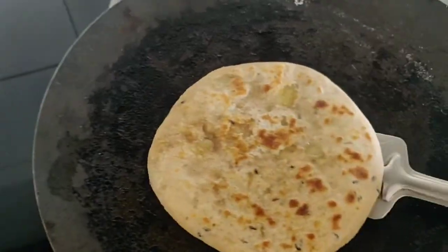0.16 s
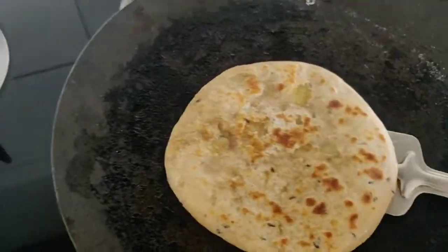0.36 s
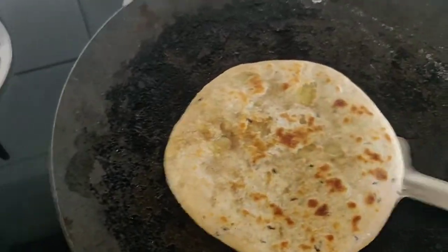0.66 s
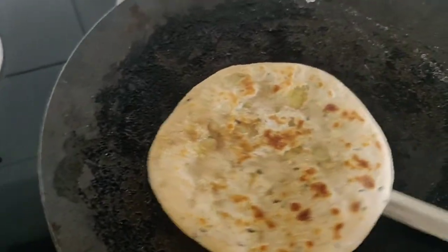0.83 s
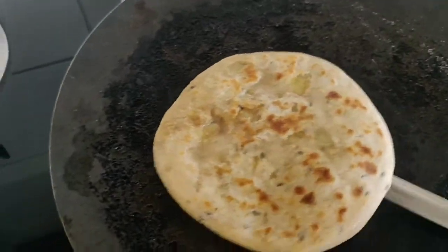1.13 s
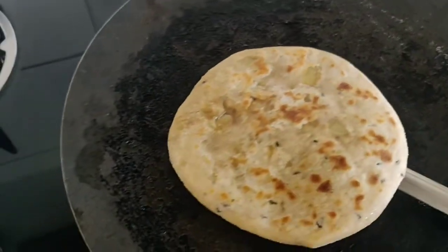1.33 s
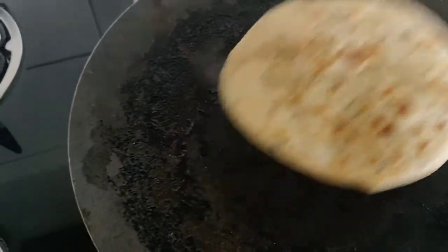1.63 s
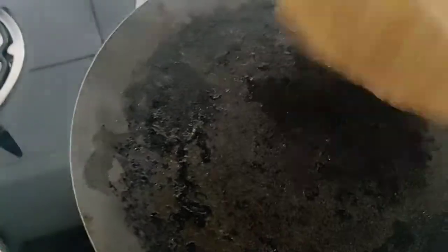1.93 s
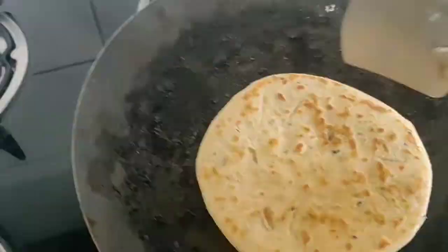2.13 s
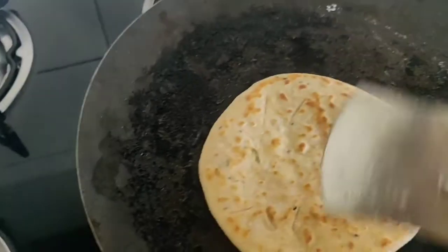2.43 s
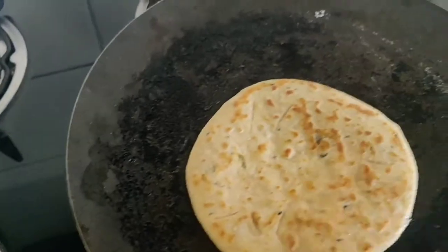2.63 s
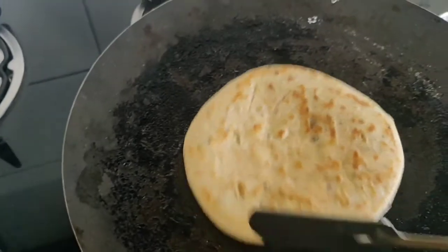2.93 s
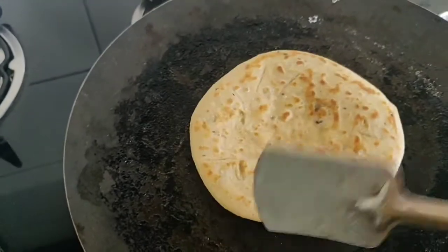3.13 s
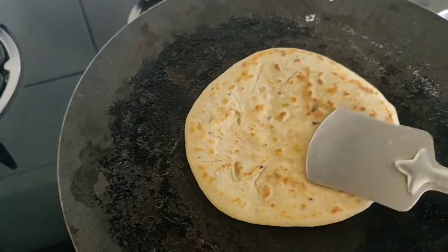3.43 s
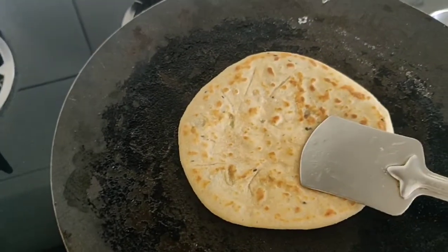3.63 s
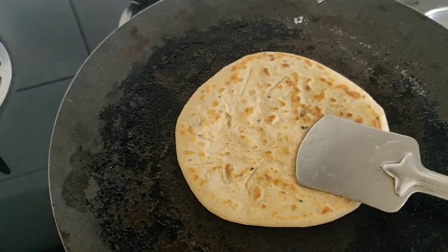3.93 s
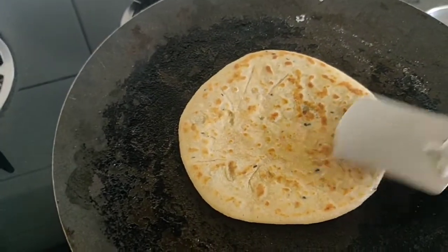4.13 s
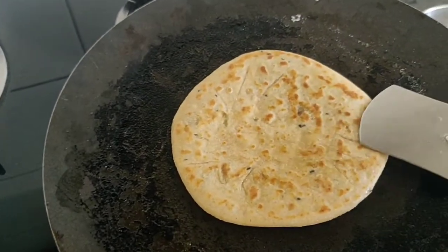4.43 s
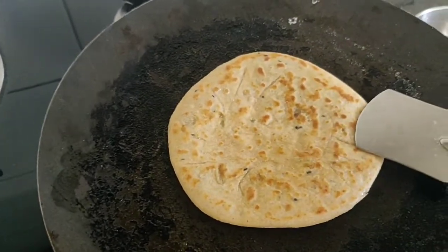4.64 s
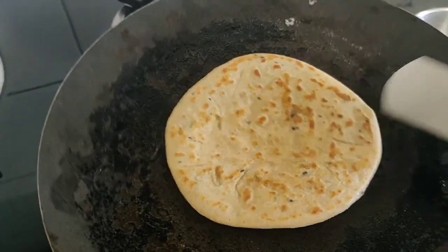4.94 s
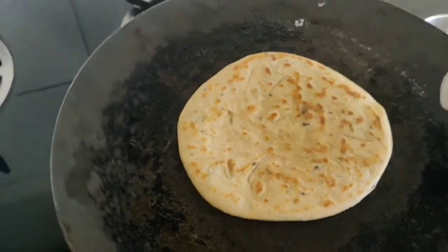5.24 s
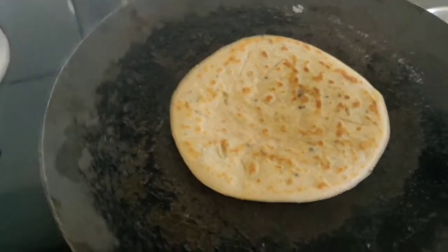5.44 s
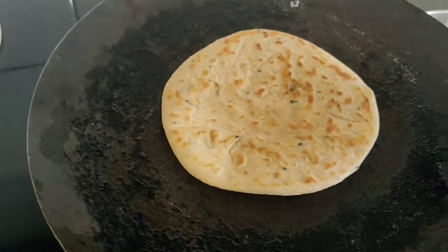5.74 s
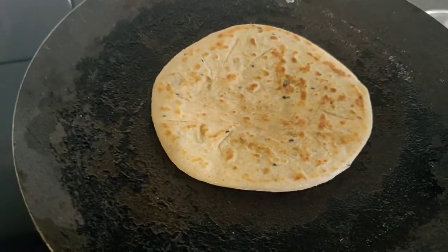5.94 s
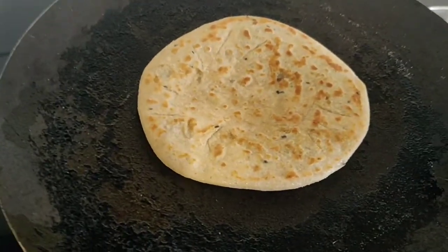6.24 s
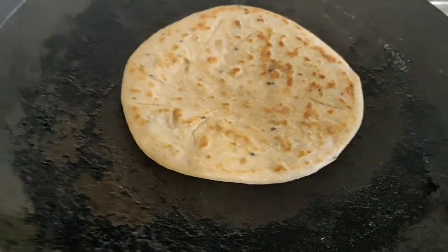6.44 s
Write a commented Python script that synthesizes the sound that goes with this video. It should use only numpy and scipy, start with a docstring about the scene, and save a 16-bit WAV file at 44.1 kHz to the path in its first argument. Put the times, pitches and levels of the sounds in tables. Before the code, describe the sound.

Close by in a home kitchen, metal rubs on hot iron and crisp crust snaps in a growing cluster. After a brief lull the bread flops over with a slap and a rattling run of knocks, followed by a bright bouncing clang. One more scrape, scattered taps and a late double-edged thud give way to fine hissing, faint high peeps and fluttering fan hum.

```python
"""A steel spatula scrapes over a hot iron griddle under a flatbread, crackling its crust, and flips it.
Catch-and-slip grains ring the blade's resonances; filtered bursts make the snaps and the bread's slap.
Decaying modes and noise make the griddle's knocks, the stove's thuds and the blade's clangs.
Dense grains sizzle and gliding sines squeal as steam, over a kitchen fan's puffs, hum and thin whine."""
import sys
import numpy as np
from scipy import signal
from scipy.fft import rfft, irfft, next_fast_len
from scipy.io import wavfile
from scipy.ndimage import map_coordinates

SR = 44100
rng = np.random.default_rng(int(sys.argv[2]) if len(sys.argv) > 2 else 0)


def persist_wave(psi):
    """Save psi, clipped to +-1, as 16-bit WAV."""
    counts = np.round(np.clip(psi, -1, 1) * 32767).astype(np.int16)
    wavfile.write(sys.argv[1], SR, np.atleast_2d(counts).T)


N = 290157
TIME = np.arange(N) / SR
AGE = np.arange(SR // 2) / SR  # seconds since an impact

# Biggest flakes of crust snapping. Each row: start in seconds, relative level in dB.
SNAPS = [(.497, -41.5), (0.579, -35), (.7195, -42), (0.77, -30.5), (0.799, -39), (.841, -33), (.865, -36),
         (.911, -37), (.955, -43), (0.9675, -23), (.989, -53), (0.994, -23), (1.035, -39), (1.039, -32),
         (1.059, -32.5), (1.117, -38), (1.127, -33.5), (1.131, -35.5), (1.145, -34), (1.16, -37),
         (1.17, -27.5), (1.1988, -29.5), (1.203, -30.5), (1.222, -25.5), (1.2375, -35.5), (1.3107, -26.5),
         (1.32, -37), (1.3959, -28.5), (2.326, -36.5), (2.447, -47), (3.034, -37), (4.081, -38.5)]
# Bread landing. Each row: centre in seconds, level in dB, spread (sigma) in seconds.
SLAPS = [(2.172, -22.5, 0.0039), (2.193, -32.5, 0.022)]


def amp(db):
    """Decibels to gain."""
    return 10 ** (np.asarray(db) / 20)


def unit(x):
    """Scale to rms 1."""
    return x / np.sqrt(np.mean(x ** 2) + 1e-20)


def fade(t60_s):
    """Exponential decay of 60 dB in t60_s."""
    return np.exp(-np.log(1000) * AGE / t60_s)


def stroke(peak_s, db, rise_s, fall_s, range_db=18.5):
    """Gain of one movement: it climbs range_db over rise_s and sinks as much over fall_s."""
    distance = np.maximum((peak_s - TIME) / rise_s, (TIME - peak_s) / fall_s)
    return amp(db - range_db * distance)


def wobble(rate):
    """Smooth random curve, rate knots per second."""
    knots = rng.standard_normal(int(N * rate / SR) + 4)
    steps = np.arange(len(knots) * 10) / 10
    smooth = map_coordinates(knots, [steps])
    return np.interp(TIME * rate, steps, smooth)


def add(track, start_s, x):
    """Mix x into the track at start_s."""
    start = max(round(start_s * SR), 0)
    track[start:start + len(x)] += x[:max(N - start, 0)]


def colour(x, points, size=8192):
    """Minimum-phase filter through (Hz, dB) points that keeps the power of white noise."""
    hz, db = np.transpose(points)
    log_f = np.log(np.fft.rfftfreq(size, 1 / SR) + 1)
    gain = unit(amp(np.interp(log_f, np.log(hz), db)))
    # folding the cepstrum makes the filter causal
    cepstrum = irfft(np.log(gain))
    cepstrum[1:size // 2] *= 2
    cepstrum[size // 2 + 1:] = 0
    impulse = irfft(np.exp(rfft(cepstrum)))[:size // 2]
    return signal.oaconvolve(x, impulse)[:len(x)]


def resonate(x, peaks):
    """Pass x through parallel (Hz, width Hz, dB) resonances of alternating sign."""
    size = next_fast_len(N + SR // 2)
    f = np.fft.rfftfreq(size, 1 / SR)
    body = 0
    for k, (hz, width_hz, db) in enumerate(peaks):
        damping = 1j * f * width_hz
        body = body + (-1) ** k * amp(db) * damping / (hz * hz - f * f + damping)
    return irfft(rfft(x, size) * body, size)[:N]


def grains(rate, spread_db, smooth):
    """Tiny impulses of scattered size, rate per second, over a share of even noise; rms 1."""
    sizes = amp(spread_db * np.clip(rng.standard_normal(N), -2, 2)) * rng.choice([-1, 1], N)
    impulses = sizes * (rng.random(N) < rate / SR)
    return unit(unit(impulses) + smooth * rng.standard_normal(N))


def ring(modes, scatter_db, rough):
    """One blow on decaying modes of alternating sign: strengths scatter, phases drift at random."""
    hz, db, t60_s = np.transpose(modes)[:, :, None]
    knots_s = AGE[::100]
    walks = np.cumsum(rng.standard_normal((len(modes), len(knots_s))), axis=1) * np.sqrt(knots_s[1])
    drift = rough * np.array([np.interp(AGE, knots_s, walk) for walk in walks])
    strength = amp(db + scatter_db * rng.standard_normal(db.shape))
    strength[1::2] *= -1
    waves = np.sin(np.float32(2 * np.pi * hz * AGE + drift))
    return np.sum(strength * fade(t60_s) * waves, axis=0)


def burst(t60_s, tail_db, tail_t60_s):
    """A crack of noise and its weak answer from the kitchen walls."""
    envelope = fade(t60_s) + amp(tail_db) * fade(tail_t60_s)
    return rng.standard_normal(len(AGE)) * envelope


def scraping():
    """Steel catches and slips on the iron and rings, wavering as the blade flexes; dry crust rasps over it."""
    # Resonances of the blade's tip, flat face and whole length, and of the iron under its edge.
    # Each row: centre in Hz, width in Hz, relative level in dB.
    tip = [(557, 48, -1.5), (1325, 17, 2.5), (1461, 26, 4), (2410, 40, -16), (2730, 33, -15)]
    flat_blade = [(300, 21, -6.5), (562, 30, 0.5), (668, 21, -1), (950, 85, -15), (1310, 64, -11),
                  (1550, 130, -19), (1910, 160, -20), (2260, 27, -8.5), (2850, 120, -24), (3820, 43, -18.5),
                  (4700, 48, -24), (5900, 150, -21)]
    whole_blade = [(550, 30, -6.5), (703, 28, 1.5), (976, 54, -10), (1120, 62, -12), (1290, 30, -7),
                   (1440, 49, -4.5), (1950, 73, -12), (2294, 46, -5), (2770, 91, -22)]
    edge = [(101, 10, 3.5), (345, 106, -6.5), (504, 100, -10.5), (716, 51, -3), (1237, 52, -5.5),
            (1331, 24, -1), (1482, 24, -4), (1870, 310, -21)]
    # Blade scrapes, catches and presses, and the bread sliding off.
    # Each row: peak in seconds, level in dB, rise and fall in seconds, ringing part.
    frictions = [(.025, -38.5, 0.15, 0.14, "tip"), (.215, -39, 0.21, 0.084, "face"),
                 (0.904, -46, 0.17, 0.21, "whole"), (1.27, -54, 0.18, 0.4, "whole"),
                 (2.135, -45.5, 0.076, 0.048, "edge"), (3.143, -38, 0.22, 0.026, "edge"),
                 (3.158, -41, 0.033, 0.027, "edge"), (3.177, -37.5, 0.035, 0.051, "edge"),
                 (3.95, -58.5, 0.3, 0.36, "edge")]
    # Relative rasp spectrum. Each row: frequency in Hz, level in dB per Hz.
    rasp_spectrum = [(600, -20), (2000, 3), (4000, 1), (6500, 4), (8100, 8.5), (9200, -9), (13000, 0.5),
                     (15800, -16)]
    bodies = {"tip": tip, "face": flat_blade, "whole": whole_blade, "edge": edge}

    slips = grains(rate=1100, spread_db=0.0, smooth=0.48)
    slips = slips * amp(2 * wobble(49))  # uneven grip
    flexed_s = np.cumsum(1 + .014 * wobble(35)) / SR  # warped time wavers the resonances
    steel = np.zeros(N)
    for *friction, part in frictions:
        ringing = np.interp(flexed_s, TIME, resonate(slips, bodies[part]))
        steel += stroke(*friction) * unit(ringing)

    clumps = amp(3.6 * np.clip(wobble(240), -1.6, 1.6))
    grit = clumps * grains(rate=1000, spread_db=4, smooth=.65)
    rasp = unit(colour(grit, rasp_spectrum))
    crumbs = np.zeros(N)  # the crust crumbles after each snap
    for start_s, db in SNAPS:
        add(crumbs, start_s, amp(db - 21) * fade(0.2))
    return steel + rasp * np.hypot(amp(-5.0) * rubbing(), crumbs)


def rubbing():
    """How hard the dry crust rubs on the blade, as a gain."""
    # Each row: hardest rub in seconds, relative level in dB, rise in seconds, fall in seconds.
    crust = [(.22, -49.5, .55, .4), (0.849, -52, 0.33, 0.53), (1.035, -53.5, 0.32, 0.066),
             (1.225, -47, 0.12, 0.13), (3.13, -48.5, 0.36, 0.14)]
    return sum(stroke(*rub) for rub in crust)


def snaps():
    """A flake breaks within milliseconds; the further the bread is lifted, the more its hollow body pops."""
    # Relative spectra of the flake and the hollow bread. Each row: frequency in Hz, level in dB per Hz.
    snap_spectrum = [(1000, -37), (3000, -8.5), (4500, -5), (8000, 14.5), (11000, 5.5), (15800, 1.5)]
    hollow_spectrum = [(400, -7), (1200, -1), (2100, 2), (2900, -0.5), (3900, 1.5), (5500, -2.5),
                       (12000, -26)]
    lift_s, lift_takes_s = 1, 0.24
    flat_db, lift_db = -1.5, 16  # pop of the bread lying flat, and what lifting adds
    sharp, hollow = np.zeros((2, N))
    landing_s = SLAPS[0][0]
    for start_s, db in SNAPS:
        lifted = np.clip((start_s - lift_s) / lift_takes_s, 0, 1) * (start_s < landing_s)
        crack = burst(t60_s=0.003, tail_db=-23, tail_t60_s=0.026)
        crack /= np.linalg.norm(crack)
        add(sharp, start_s, amp(db + 12.5) * crack)
        add(hollow, start_s, amp(db + flat_db + lift_db * lifted) * crack)
    return colour(sharp, snap_spectrum) + colour(hollow, hollow_spectrum)


def knocks():
    """Blade and bread tap the griddle, or it rocks on its stand; each contact rings iron and shakes the stove."""
    # Each row: start in seconds, then relative levels in dB of the knock, stove thud and bright tick.
    contacts = [(1.167, -37.5, -51, -47), (2.081, -33.5, -41.5, -48.5), (2.142, -33, -43, -52),
                (2.168, -15.5, -29.5, -27.5), (2.192, -19.5, -22.5, -35), (2.237, -19, -28.5, -52),
                (2.274, -20, -21.5, -46), (2.362, -19.5, -29.5, -44.5), (2.394, -27.5, -43.5, -50.5),
                (2.462, -26.5, -24.5, -56), (2.486, -23.5, -28, -52.5), (2.505, -24.5, -28, -53),
                (2.57, -35.5, -30.5, -65), (2.592, -36, -37.5, -64), (2.644, -38.5, -35.5, -68),
                (2.721, -31, -32.5, -63), (2.789, -36, -41, -68), (2.8174, -20, -24.5, -47),
                (3.581, -28.5, -44.5, -42.5), (4.43, -43.5, -60, -55), (4.484, -45.5, -63, -69),
                (4.9583, -21, -25, -35.5), (4.984, -38, -36, -60), (5.018, -26.5, -28.5, -56),
                (5.069, -31.5, -35, -60), (5.091, -32, -30.5, -58), (5.1216, -34, -37.5, -59),
                (5.149, -33, -33.5, -69), (5.17, -36.5, -44, -71), (5.25, -39.5, -47, -66)]
    # Modes. Each row: frequency in Hz, relative level in dB, 60 dB decay in seconds.
    griddle_modes = [(293, -12, 0.3), (405, -12.5, 0.42), (448, -12, 0.26), (693, -2, 0.069),
                     (752.4, 0.5, 0.075), (1200, 0, 0.025), (1256, -2.5, 0.073), (1535, -22, 0.065),
                     (1306, -5, 0.094), (1804, -18.5, 0.15), (1934, -12, 0.07), (2003, -19.5, 0.054),
                     (2715, -24.5, 0.16)]
    stove_modes = [(49.6, -10, 0.74), (77.6, -6, 0.77), (101.55, -1, 0.65), (115.8, -6.5, 0.66),
                   (206.2, -1.5, 0.38), (235.6, -6.5, 0.18)]
    # Relative spectra. Each row: frequency in Hz, level in dB per Hz.
    thud_spectrum = [(25, -33), (55, -7.5), (90, 3), (125, 0.5), (170, -12.5), (220, -7), (330, -7),
                     (600, -17), (2000, -71.5)]
    clack_spectrum = [(100, -2), (300, -3), (750, 0.5), (950, -7.5), (1300, -3), (2000, -14), (3500, -28),
                      (9000, -63)]
    tick_spectrum = [(1500, -18), (3000, -0.5), (4300, -2), (5600, 2), (7700, 7), (10000, -7.5),
                     (15800, -13)]
    ringing, clack, tick, thud = np.zeros((4, N))
    swell = 1 - np.exp(-AGE / 0.0033)  # the heavy stove takes a moment to move
    for start_s, db, thud_db, tick_db in contacts:
        iron = ring(griddle_modes, scatter_db=3, rough=4.4)
        add(ringing, start_s, amp(db - 11.0) * iron)
        stove = swell * ring(stove_modes, scatter_db=1.5, rough=3.3)
        add(ringing, start_s, amp(thud_db - 5.5) * stove)
        rumble = swell * burst(t60_s=0.076, tail_db=-15, tail_t60_s=0.8)
        add(thud, start_s, amp(thud_db - 2.5) * rumble)
        impact = burst(t60_s=0.015, tail_db=-13, tail_t60_s=0.37)
        add(clack, start_s, amp(db - 9.0) * impact)
        add(clack, start_s, [amp(db - 1.0)])  # the hard contact itself
        bright = burst(t60_s=0.056, tail_db=-12.5, tail_t60_s=0.49)
        add(tick, start_s, amp(tick_db - 5) * bright)
    noises = colour(thud, thud_spectrum) + colour(clack, clack_spectrum) + colour(tick, tick_spectrum)
    return ringing + noises


def slaps():
    """The limp bread meets the iron over several milliseconds in a swarm of small touches."""
    # Relative spectrum. Each row: frequency in Hz, level in dB per Hz.
    slap_spectrum = [(100, -54.5), (320, -16), (750, 5), (950, -3), (1320, 16.5), (1700, 1.5), (3000, -2.5),
                     (7800, -12), (9500, -24), (15800, -30)]
    contact = np.zeros(N)
    for centre_s, db, spread_s in SLAPS:
        contact += amp(db) * np.exp(-.5 * ((TIME - centre_s) / spread_s) ** 2)
    touches = grains(rate=5000, spread_db=2, smooth=.6)
    return colour(contact * touches, slap_spectrum)


def clangs():
    """The blade strikes the griddle and bounces; each blow rings its modes under a dense clash of noise."""
    # Each row: start in seconds, relative level in dB.
    strikes = [(2.817, -13), (2.842, -27), (2.857, -25), (2.908, -25.5), (2.931, -37.5)]
    # Each row: mode frequency in Hz, relative level in dB, 60 dB decay in seconds.
    blade_modes = [(331, 0, 0.48), (440, -15, 0.3), (676, -1, 0.25), (715, 0, 0.11), (756, 1, 0.12),
                   (1005, -11, 0.26), (1190, -16, .16), (1297, -14, .2), (1426, -10, 0.22),
                   (1470, -4, 0.17), (1792, -18, .17), (1868, -14, 0.22), (2218, -14, 0.16),
                   (2440, -22, .17), (2760, -14, .12), (3090, -15, 0.2), (3478, -22, 0.22),
                   (3630, -23, .14), (3822, -16, 0.13), (4638, -26, 0.26), (5292, -29, .2),
                   (5528, -23, 0.21), (6492, -26, 0.2), (7300, -30, .22), (7531, -24, 0.2),
                   (8646, -33, 0.23)]
    # Relative spectrum. Each row: frequency in Hz, level in dB per Hz.
    clash_spectrum = [(150, -22), (340, -7.5), (520, 4), (740, 10), (930, -8.5), (1100, -5), (1450, -6.5),
                      (1750, -16), (2100, -27), (2800, -20.5), (3800, -24), (4150, -34), (5500, -25),
                      (7050, -38), (8000, -31), (15800, -48)]
    ringing, clash = np.zeros((2, N))
    for start_s, db in strikes:
        add(ringing, start_s, amp(db - 10.5) * ring(blade_modes, scatter_db=1.0, rough=5.6))
        add(clash, start_s, amp(db - 1.5) * burst(t60_s=0.028, tail_db=-15.5, tail_t60_s=0.39))
        add(clash, start_s, [amp(db + 11.5)])  # the hard contact itself
    return ringing + colour(clash, clash_spectrum)


def sizzle():
    """Moisture boiling off the dough: countless tiny bursts of steam make a fine hiss."""
    # Each row: time in seconds, level of the hiss's treble in dB.
    treble_level = [(0.0, -66), (0.73, -65.5), (1.06, -59.5), (1.21, -60), (1.47, -65.5), (1.7, -73),
                    (2.12, -71.5), (2.23, -73), (2.8, -69), (3.01, -65), (3.41, -70), (3.88, -64),
                    (5.18, -64.5), (6.58, -66)]
    # Relative spectrum. Each row: frequency in Hz, level in dB per Hz.
    hiss_spectrum = [(2000, -25), (3200, -36), (4600, -7), (6200, 0), (7900, 3.5), (9400, -3),
                     (12000, -2.5), (15800, -5)]
    whole_over_treble_db = 3.5
    fizz = unit(colour(grains(rate=2100, spread_db=23, smooth=2.8), hiss_spectrum))
    return fizz * amp(np.interp(TIME, *np.transpose(treble_level)) + whole_over_treble_db)


def squeals(count=26):
    """Steam pockets whistle through gaps, pitch sliding unsteadily with pressure; smaller ones peep between."""
    # Clearest squeals. Each row: start and length in seconds, nominal start and end in Hz, nominal dB.
    clear_squeals = [(4.12, 0.025, 7300, 6230, -63), (4.64, 0.03, 7200, 5900, -59),
                     (4.735, 0.056, 7600, 6600, -59), (4.83, .05, 7300, 6400, -58),
                     (5.08, .05, 7650, 6500, -61), (5.535, 0.079, 8400, 7600, -63),
                     (5.595, 0.08, 8150, 6600, -61.5), (5.715, 0.065, 7700, 6700, -61),
                     (5.775, 0.068, 7250, 7400, -63), (5.845, .03, 6700, 7350, -62),
                     (5.875, 0.079, 7300, 6650, -62), (6.06, 0.082, 9000, 6100, -59.5),
                     (6.53, 0.035, 6950, 6250, -62.5)]
    track = np.zeros(N)
    flutter = 1 + .02 * wobble(1100) + .018 * wobble(80)
    pockets = list(clear_squeals)
    for _ in range(count):
        # lowest and highest start in s, length in s, start pitch in Hz
        start_s, length_s, hz = rng.uniform((3.65, .015, 6400), (6.5, .045, 8600))
        end_hz = hz * rng.uniform(.88, 1.05)
        peep_db = -66 + 2 * rng.standard_normal()
        pockets.append((start_s, length_s, hz, end_hz, peep_db))
    for start_s, length_s, start_hz, end_hz, db in pockets:
        spent = np.linspace(0, 1, round(length_s * SR))
        glide_hz = start_hz + (end_hz - start_hz) * spent
        pitch_hz = glide_hz * np.roll(flutter, -round(start_s * SR))[:len(spent)]
        swell = np.sqrt(np.abs(np.sin(np.pi * spent)))
        add(track, start_s, amp(db) * swell * np.sin(2 * np.pi * np.cumsum(pitch_hz) / SR))
    return track * amp(3 * wobble(150))


def fan(turn_hz=24.66):
    """A fan hums and puffs once a turn, over a thin electrical whine and the steady rush of the room."""
    # Relative spectra. Each row: frequency in Hz, level in dB per Hz.
    puff_spectrum = [(40, -3), (90, -2.5), (250, 5.5), (480, -1), (740, 2.5), (950, -19), (2000, -19),
                     (5000, -50)]
    room_spectrum = [(15, -79), (28, -6), (50, -8.5), (96, -2), (145, -4), (197, -14), (304, -7),
                     (362, -11), (610, -16), (710, -16), (1000, -22), (2610, -32), (2980, -26),
                     (3320, -29.5), (4500, -35), (5850, -37), (9900, -120)]
    # Hum and whine lines. Each row: frequency in Hz, nominal rms level in dB (the whine's before its swell).
    hum_lines = [(146.8, -53.5), (294, -64.5), (436, -66)]
    whine_lines = [(2942, -74.5), (3090, -80.5), (3530, -82)]
    # The whine sinks and swells again. Each row: time in seconds, gain in dB.
    whine_swell = [(0, 3.5), (4.6, 0.5), (6.5, 5.5)]
    turns = np.cumsum(turn_hz * (1 + .012 * wobble(3))) / SR + .03 * wobble(24)
    puffs = np.zeros(N)
    for start_s in TIME[1:][np.diff(np.floor(turns)) > 0]:
        puff = .12 * burst(t60_s=.035, tail_db=-5, tail_t60_s=.11)
        puff[0] -= 1.3  # one sharp impulse opens the puff
        add(puffs, start_s, amp(2.9 * rng.standard_normal()) * puff)
    flutter = amp(-57.0) * unit(colour(puffs, puff_spectrum))
    whine = tones(whine_lines, waver_db=1.5, drift=0.41)
    whine = whine * amp(np.interp(TIME, *np.transpose(whine_swell)))
    rush = amp(-53.5) * unit(colour(rng.standard_normal(N), room_spectrum))
    return flutter + rush + whine + tones(hum_lines, waver_db=1.34, drift=0.28)


def tones(lines, waver_db, drift):
    """Sine lines that waver a little in level and phase (drift in radians)."""
    total = np.zeros(N)
    for hz, db in lines:
        level = amp(db + waver_db * wobble(11))
        total += level * np.sin(2 * np.pi * hz * TIME + drift * wobble(12))
    return np.sqrt(2) * total


def scene():
    """All sources summed into one channel."""
    cooking = scraping() + snaps() + knocks() + slaps() + clangs() + sizzle() + squeals()
    return (cooking + fan())[None]


def record(dry):
    """The microphone sheds the deepest bass, and the recorder keeps nothing above its band limit."""
    top_hz = 15900
    size = next_fast_len(N + SR // 2)
    lean = signal.sosfilt(signal.butter(3, 40, "highpass", fs=SR, output="sos"), dry)
    kept = np.fft.rfftfreq(size, 1 / SR) < top_hz
    return irfft(rfft(lean, size) * kept, size)[:, :N]


dry = scene()
out = record(dry)
persist_wave(out)
```